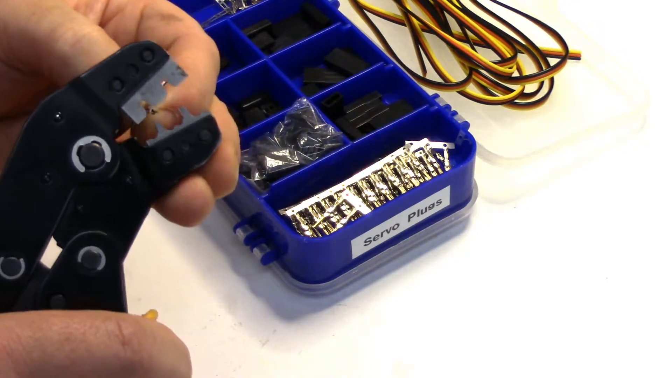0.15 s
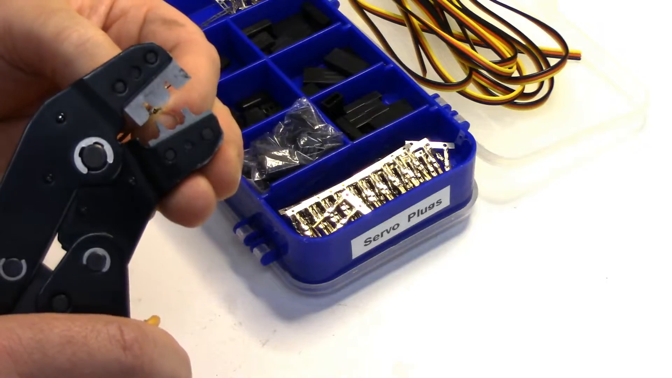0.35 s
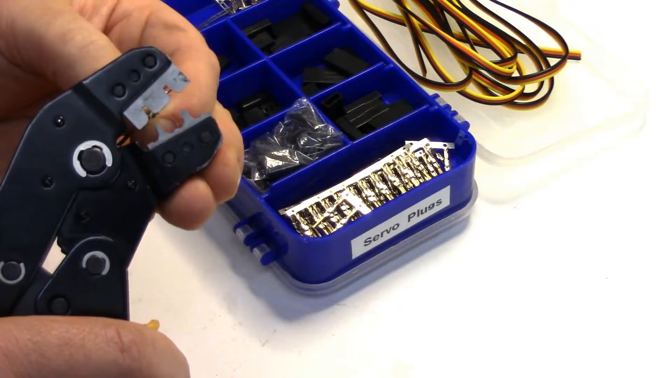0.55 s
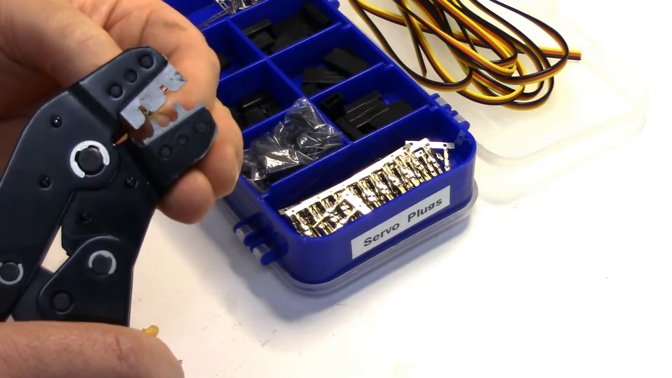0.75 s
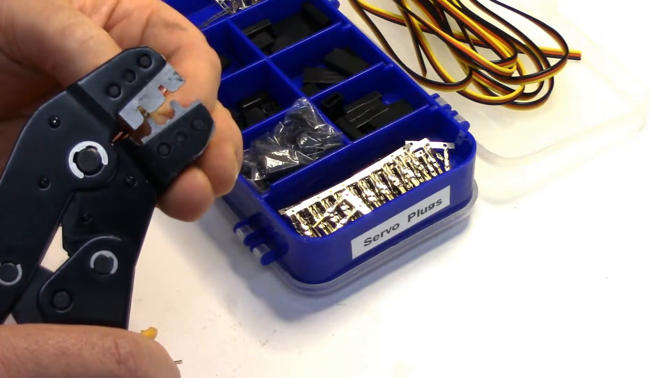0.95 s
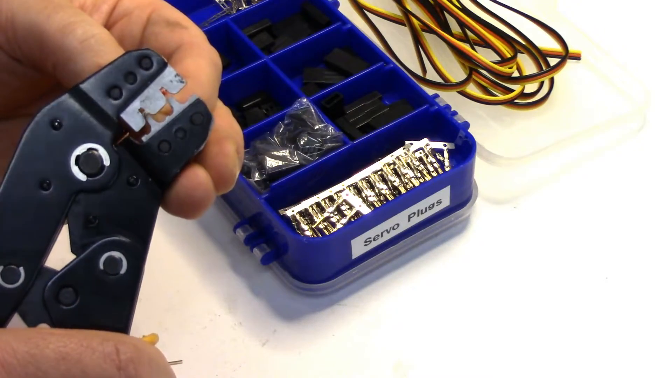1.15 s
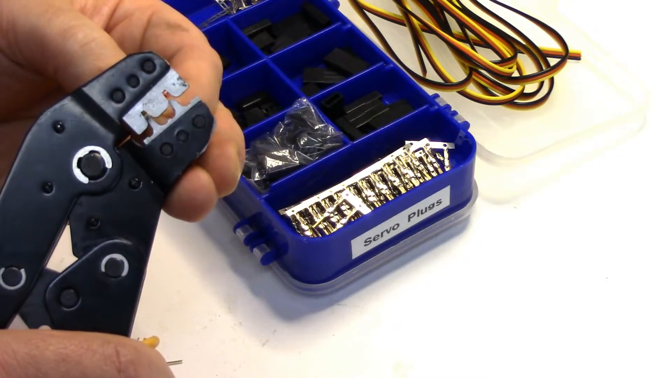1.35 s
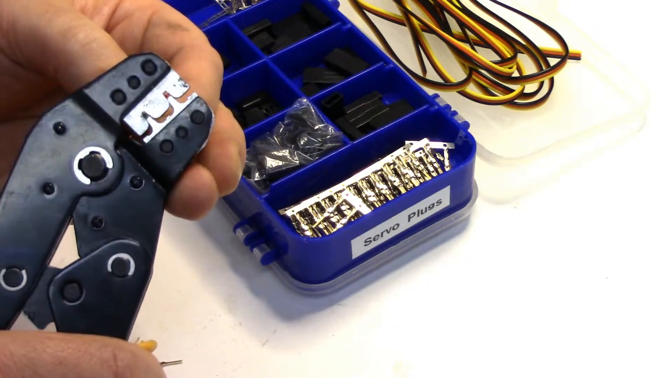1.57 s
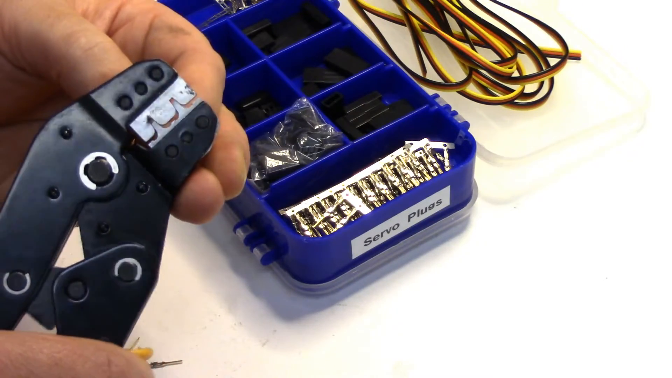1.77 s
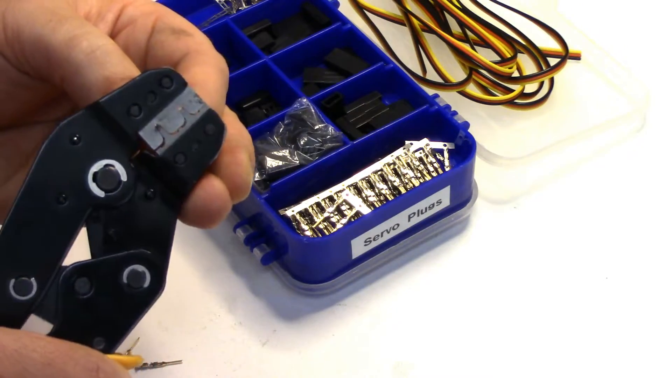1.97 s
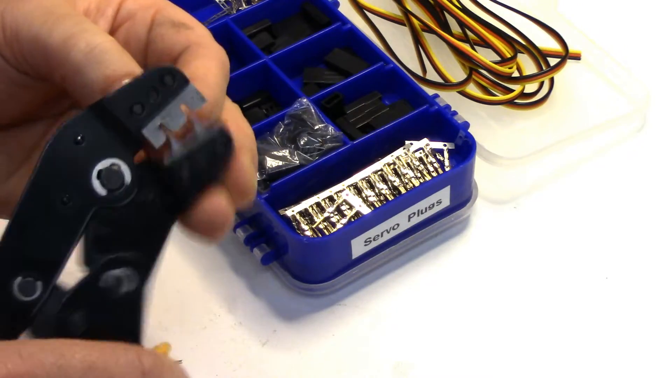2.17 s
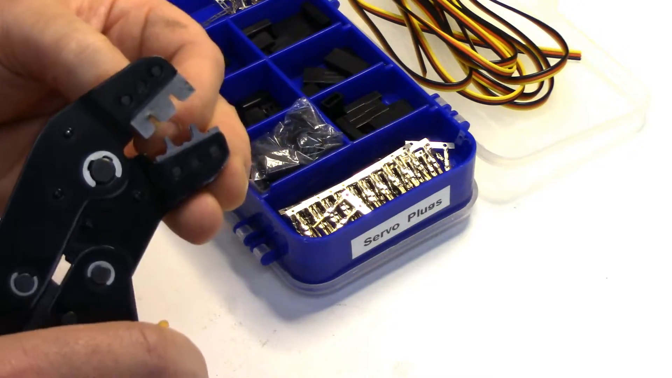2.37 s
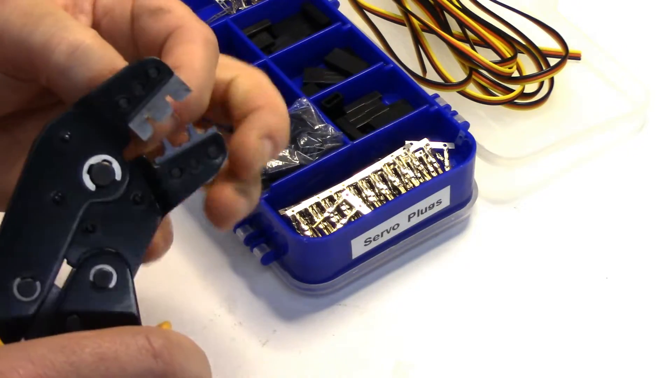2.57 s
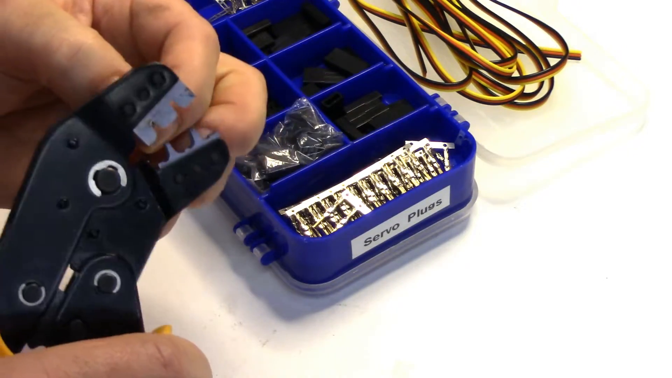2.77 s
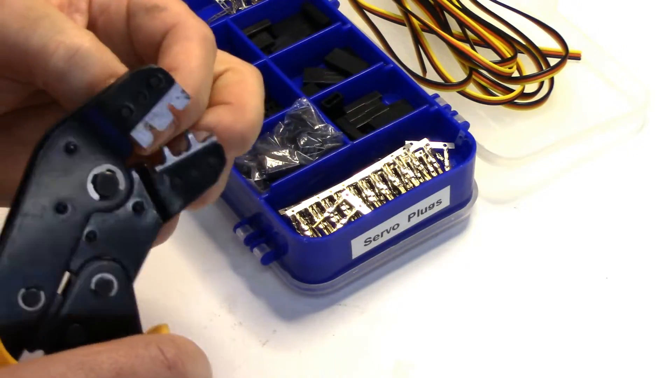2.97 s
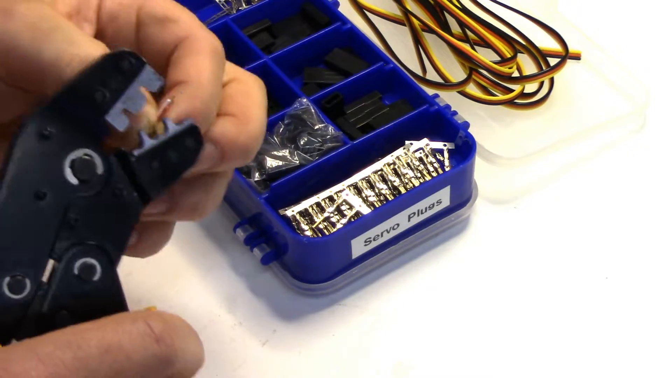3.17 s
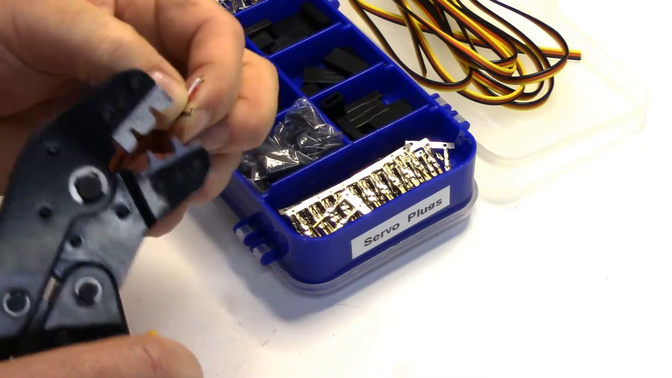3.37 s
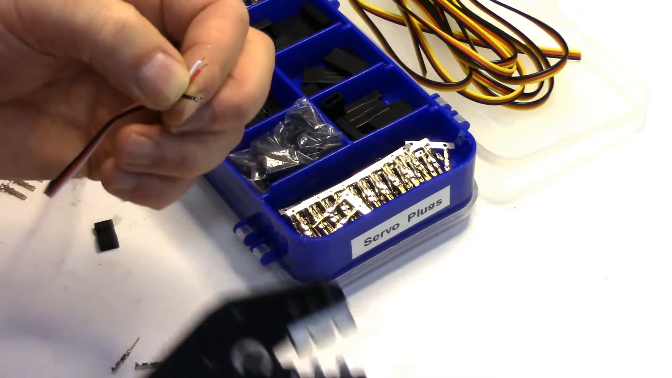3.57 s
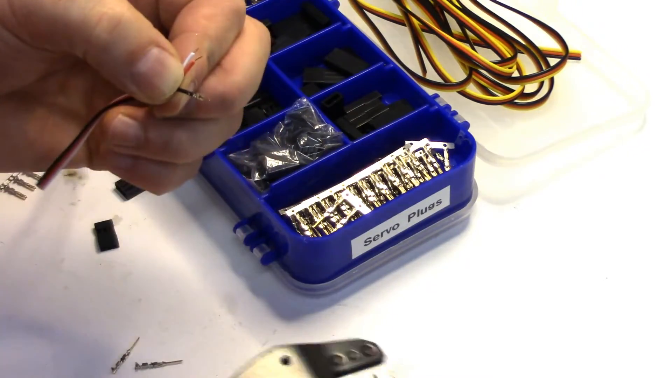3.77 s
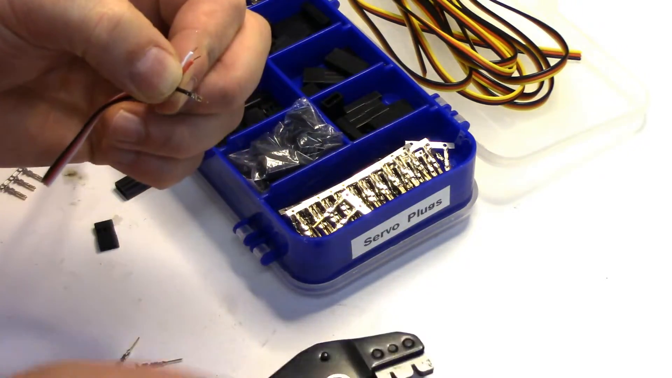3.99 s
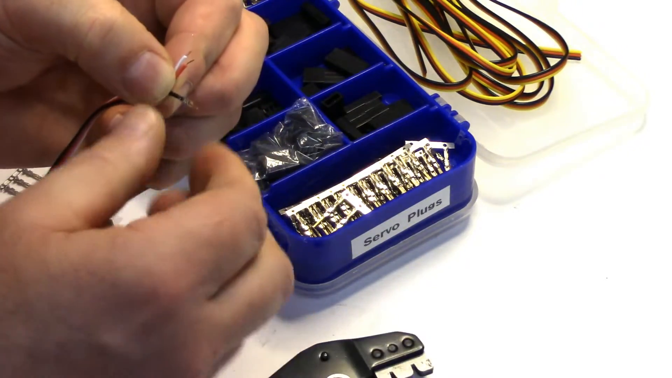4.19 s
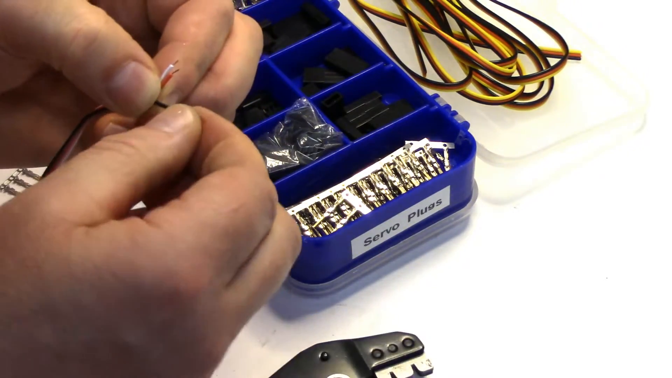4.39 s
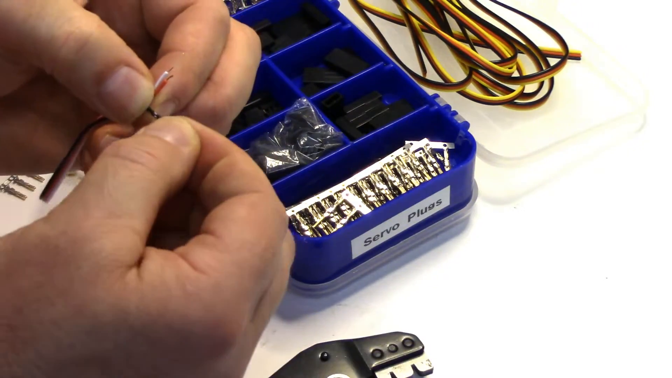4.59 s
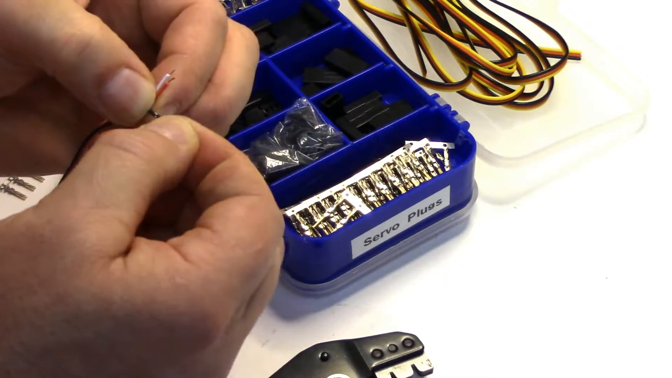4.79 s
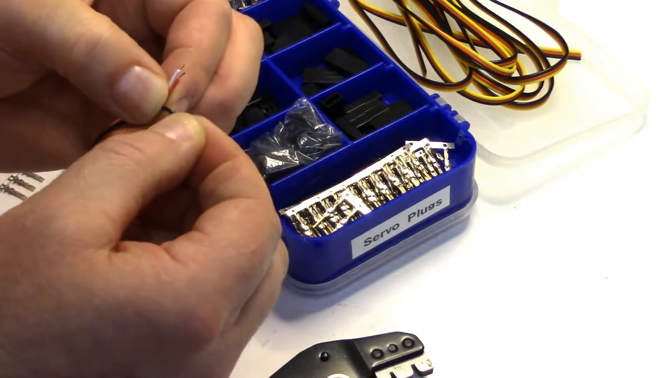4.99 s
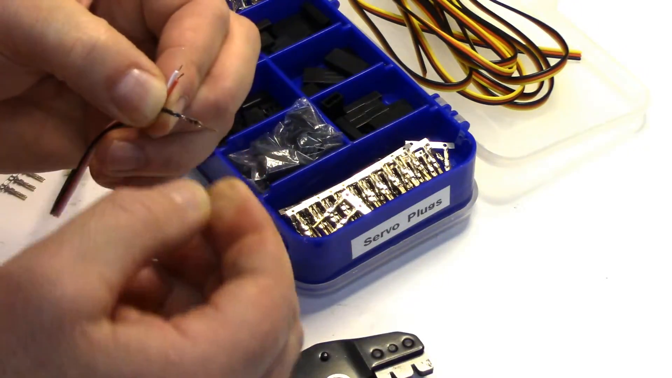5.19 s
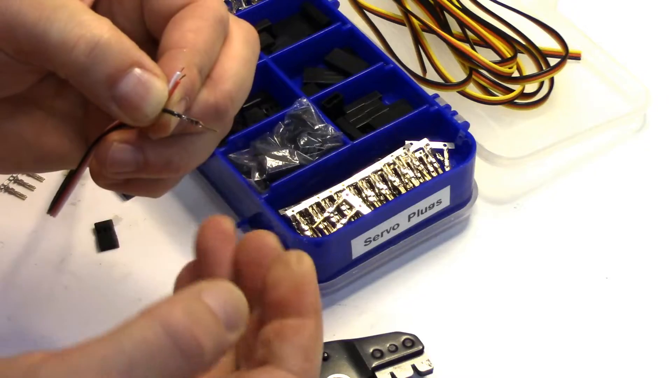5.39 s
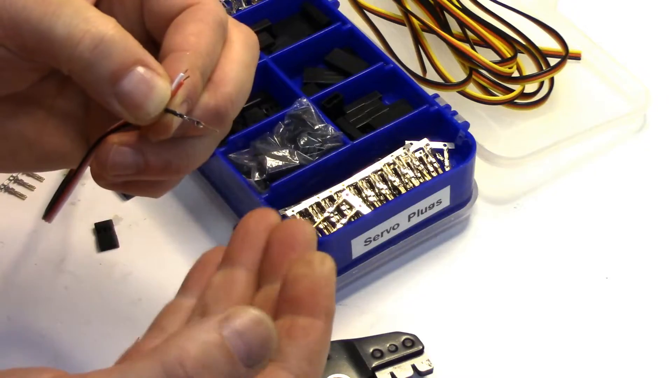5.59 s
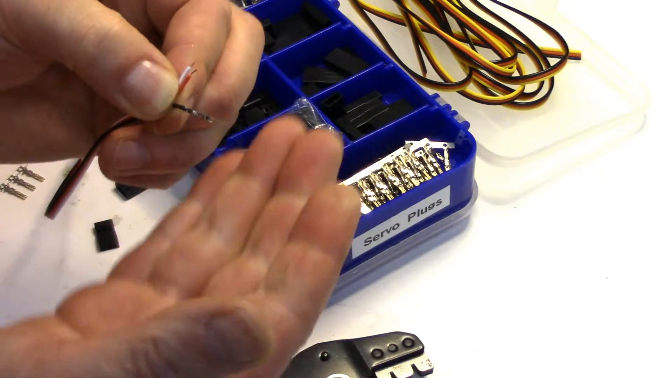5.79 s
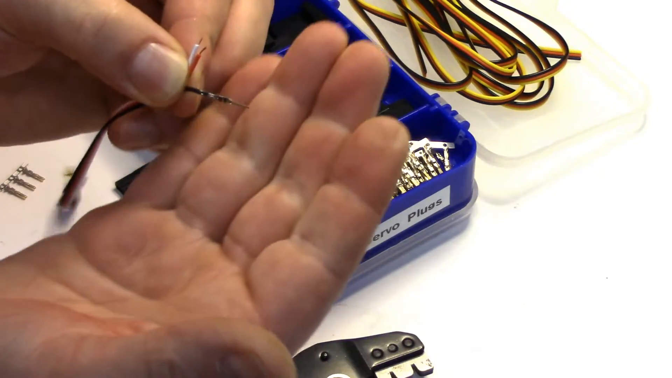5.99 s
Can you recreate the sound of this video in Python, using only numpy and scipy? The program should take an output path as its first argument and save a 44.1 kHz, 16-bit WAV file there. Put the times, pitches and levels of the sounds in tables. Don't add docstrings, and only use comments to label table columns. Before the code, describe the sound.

A ratcheting crimping tool gives four sharp steel clicks, snaps shut, rattles open, then is set down with a clattering knock on a hollow bench.

```python
import sys
import numpy as np
from scipy import signal
from scipy.fft import rfft, irfft, next_fast_len
from scipy.io import wavfile
from scipy.ndimage import map_coordinates

SR = 44100
rng = np.random.default_rng(int(sys.argv[2]) if len(sys.argv) > 2 else 0)


def gain_from_db(level_db):
    decades = np.asarray(level_db, float) / 20
    return 10 ** decades


def to_wav(sig):
    pcm = np.clip(np.atleast_2d(sig), -1, 1) * 32767
    pcm = np.round(pcm).astype(np.int16)
    wavfile.write(sys.argv[1], SR, pcm.T)


N = 266760

# start in seconds, peak in dB, contact length in seconds.
TEETH = [
    (1.1605, -3.5, 0.01346),
    (1.48, -6.5, 0.0209),
    (1.589, -6, .008),
    (1.8156, -5.5, 0.0066),
]
# start in seconds, peak in dB, contact length in seconds.
JAWS = [
    (1.8499, -6, 0.018),
    (1.8719, -12.5, 0.0194),
    (1.8739, -1.5, 0.0208),
    (1.886, -15.5, 0.0124),
]
# start in seconds, peak in dB, contact length in seconds.
RATTLE = [
    (2.2187, -5, 0.032),
    (2.2243, -5, .016),
    (2.2293, -5, 0.0092),
    (2.2328, -6, .016),
    (2.2375, -11, .014),
    (2.2408, -4.5, 0.0128),
    (2.258, -20, 0.0136),
]
# start in seconds, peak in dB, contact length in seconds.
SLACK = [
    (1.0715, -50, 0.048),
    (1.1338, -47.5, 0.0074),
    (1.4705, -40.5, 0.0158),
    (2.168, -38.5, 0.0127),
    (2.1904, -29, 0.017),
    (2.2014, -38.5, 0.022),
]
# start in seconds, peak in dB.
TOUCHES = [
    (.7053, -46.5),
    (0.7215, -46),
    (0.963, -55.5),
    (3.1393, -40),
    (3.1474, -45),
    (3.1752, -40.5),
    (3.1841, -46.5),
    (3.2139, -50),
    (3.2269, -49),
    (3.3404, -51.5),
]
# start in seconds, peak in dB.
GRAZES = [
    (3.82, -49.5),
    (3.835, -46),
]
# frequency in Hz, width in Hz, level in dB.
STEEL = [(1260, 1000, -20.5), (1700, 440, -8.5), (2150, 560, -13), (3090, 1000, 11.5), (3280, 120, -8.5),
         (3620, 300, -6), (5100, 790, 11), (6176, 1600, 10), (8340, 1300, 10), (9700, 2000, 5.5),
         (13430, 2700, -2)]
# frequency in Hz, level in dB, t60 in seconds.
PAWL = [(2040, -2, .16), (2290, -2.5, .16), (2930, -2.5, 0.22), (3230, -5.5, .14), (3670, -3.5, 0.3),
        (5800, -4, .22), (6600, -5, .15)]
# frequency in Hz, level in dB, t60 in seconds.
SHUT = [(950, -24, 2), (1680, 8, 0.085), (1776, -3, 0.26), (1850, -7, 0.47), (2988, -11.5, 0.228),
        (3210, 1, .2), (3305, -4.5, 0.3542), (5960, -5, .35), (6360, -11, .2)]
# frequency in Hz, level in dB, t60 in seconds.
OPEN = [(951, -15.5, 1.2), (2173, -6, .25), (2960, -11, .25), (5480, -2.5, 0.353), (3847, 1.5, .3)]
# frequency in Hz, level in dB, t60 in seconds.
FADING = [(3670, -1, .35), (6616, -9.5, .3)]
# start in seconds, level in dB.
FAINT_RINGS = [
    (.001, -55),
    (1.071, -55.5),
]
# time in seconds, pitch in Hz, level in dB.
SPRING = [
    (2.245, 3690, -38),
    (2.3, 3690, -48),
    (2.39, 3680, -53),
    (2.45, 3820, -53),
    (2.52, 3800, -59),
    (2.56, 3790, -70),
]
# start in seconds, peak in dB,
# hardness in dB.
KNOCKS = [(1.886, -33.5, -8), (3.8733, 0.5, -10), (3.887, -6.5, -7.5), (3.898, -6.5, -6),
          (3.913, -2.5, -9.5), (3.925, -3.5, -11.5), (3.950, -13.5, -8.5), (3.9636, -9.5, -5),
          (3.9764, -4.5, -8), (3.990, -11.5, -2.5), (4.0017, -12, 3.5), (4.0048, -5.5, -19),
          (4.018, -12, -10), (4.0382, -17, 6.5), (4.043, -8.5, -20.5), (4.057, -14.5, -4.5),
          (4.084, -11, -20), (4.100, -18.5, -11.5), (4.125, -31.5, -1), (4.177, -14.5, -20.5),
          (4.205, -27.5, -14), (4.235, -30, -18.5)]
# start in seconds, peak in dB.
TICKS = [
    (3.8738, -22),
    (3.911, -32),
    (3.9635, -39.5),
    (3.9765, -48.5),
    (3.990, -50.5),
    (4.0014, -17),
    (4.0045, -26),
    (4.0385, -34.5),
]
# frequency in Hz, width in Hz, level in dB.
BENCH = [(114, 13, -12), (189, 26, -9), (270, 44, -10), (396.1, 45, 1.5), (470.8, 53, -3), (580.7, 45, 1),
         (718.3, 73, -0.5), (920, 384, -7), (1159, 440, -9)]
# frequency in Hz, width in Hz, level in dB.
FACE = [(1393, 698, -1.5), (1936.5, 600, 6.5), (2244.6, 630, 4.5), (2815.5, 724, -1.5)]
# start in seconds, peak in dB, pitch in Hz, beats to the first weak step, count of weak steps.
LENS = [(3.5623, -45, 2050, 0, 0), (3.5992, -41.5, 1800, 0, 0), (3.7504, -43, 2050, 3, 1),
        (4.3508, -41.5, 2080, 3, 4), (4.5508, -45.5, 2065, 2, 2), (4.703, -47.5, 1680, 2, 1),
        (4.801, -43, 2100, 3, 3), (5.0013, -43.5, 2097, 2, 1), (5.1515, -44.5, 2100, 2, 1),
        (5.334, -44, 2010, 2, 1), (5.5521, -42, 2090, 3, 4), (5.785, -44.5, 2050, 0, 0),
        (5.9362, -43, 2080, 0, 0)]
# peak time in seconds, level in dB, rise and fall in dB per second.
HANDS = [
    (2.56, -57.5, 76, 162.5),
    (2.68, -61.5, 58.5, 116),
    (3.27, -58, 46.5, 87.5),
    (5.55, -51, 400, 259.5),
]
# frequency in Hz, level in dB per Hz.
RUB = [(200, -30.5), (450, -2.5), (800, -1), (1500, -4), (3000, -18.5), (6000, -35.5)]
# frequency in Hz, level in dB per Hz.
RUMBLE = [(60, -38), (130, -9.5), (200, -7), (280, 2), (340, -7.5), (450, -16.5), (800, -45)]
# frequency in Hz, level in dB per Hz.
HISS = [(15, -58.5), (25, -31), (114, -10), (280, -4.5), (726, -9), (2250, -17.5), (11900, -36),
        (16500, -54.5)]
# frequency in Hz, level in dB.
HUM = [(118.4, -71), (242.2, -66.5), (360.7, -72.5), (479.1, -72.5), (839.8, -65), (958.2, -75.5),
       (1319, -74), (2073, -79.5), (5561, -87.5), (11639, -92)]
# frequency in Hz, correlation.
ALIKE = [(60, .7), (240, 0.74), (950, 0.655), (3770, 0.798), (8000, 0.93), (15000, 0.27)]
# frequency in Hz, t60 in seconds.
ROOM = [(100, 0.98), (500, 0.51), (1200, 0.61), (3000, .52), (6000, 0.453), (10000, .32), (14000, 0.22)]
# frequency in Hz, correlation from 0 to 1.
WALLS = [(100, 1), (600, .99), (2000, 1), (5000, 1), (12000, .6)]
# frequency in Hz, gain in dB.
MIC = [(20, 2.5), (50, 6), (90, 0), (14500, 1.5), (15600, -2.5), (16500, -13)]
# end in seconds, lowest frequency lost in Hz.
STARVED = [
    (1.155, 2500),
    (1.471, 2000),
    (1.586, 6000),
    (2.213, 1500),
    (3.870, 30),
]

# (frame dB, jaw dB, edge dB)
TOOTH, JAW, LOOSE = (-3, -3.5, 2), (8, -1, -3), (-1.5, -2.5, -2)
LINK, WIRE, TIP = (-3.5, 0.915, -3.5), (-11.5, -3.5, 1), (1.5, 12.5, -18.5)
TOUCH_S, GRAZE_S = .015, 0.061
RING_LAG_S, PAWL_RING_DB = .001, -31
SHUT_RING, OPEN_RING = (1.875, -29.5), (2.234, -33)  # (s, dB)
KNOCK_S, SOFTER_S_PER_DB = .029, 0.007
DULL_PER_DB, BENCH_MID_HZ = 0.3627, 420
KNOCK_SHOCK = .7
BEAT_S, SETTLE_S = 1 / 59.94, .0014
WEAK_DB, WEAK_FADE_DB, WEAK_HZ, WEAK_SCATTER_HZ = -48.5, 1, 1960, 110
WHINE_HZ, WHINE_DB, AWAKE_S = 5630, -81.5, 3.55
RUMBLE_DB, RUMBLE_HOLD_S, RUMBLE_FADE_DB_PER_S, HISS_DB = -58, 1.596, 4.5, -56
LAG = 1.1
TOP_HZ = 16600
FRAME, FRAME_START = 1024, 150


def clicks(near, far):
    touches = [(s, db, TOUCH_S) for s, db in TOUCHES]
    grazes = [(s, db, GRAZE_S) for s, db in GRAZES]
    kinds = [(TEETH, TOOTH), (JAWS, JAW), (RATTLE, LOOSE), (SLACK, LINK), (touches, WIRE), (grazes, TIP)]
    for rows, (frame_db, jaw_db, edge_db) in kinds:
        share = [(1700, frame_db), (3300, jaw_db), (6200, 0.0015), (11500, edge_db)]
        tool = [(hz, width, db + along(share, hz)) for hz, width, db in STEEL]
        for s, db, length in rows:
            strike(near, far, s, db, [(tool, 0, length, .0002)], after_db=-11.5, wet_db=-13.0)


def rings(near):
    blows = [(s + RING_LAG_S, db + PAWL_RING_DB, PAWL) for s, db, _ in TEETH + JAWS[:1]]
    blows += [(*SHUT_RING, SHUT), (*OPEN_RING, OPEN)]
    blows += [(s, db, FADING) for s, db in FAINT_RINGS]
    for s, db, modes in blows:
        add(near, s, gain_from_db(db) * ring(modes, beat=4))
    s, hz, db = np.transpose(SPRING)
    t = np.arange(s[0], s[-1], 1 / SR)
    swell, shiver = wobble(80)[:len(t)], wobble(120)[:len(t)]
    phase = 2 * np.pi * np.cumsum(np.interp(t, s, hz)) / SR + 1.3 * shiver
    add(near, s[0], gain_from_db(np.interp(t, s, db) + 3 * swell) * np.sin(phase))


def knocks(near, far):
    for s, db, hard_db in KNOCKS:
        length = KNOCK_S + SOFTER_S_PER_DB * abs(hard_db)
        tilt = DULL_PER_DB * min(hard_db + 7, 0)
        top = [(hz, width, g + tilt * np.log2(hz / BENCH_MID_HZ)) for hz, width, g in BENCH]
        parts = [(top, 0, length, .0003), (FACE, hard_db, length * 1.1, .0003)]
        strike(near, far, s, db, parts, after_db=-18, wet_db=-12.0, shock=KNOCK_SHOCK)
    for s, db in TICKS:
        strike(near, far, s, db, [(STEEL, 0, .016, .0004)], after_db=-16, wet_db=-11.5)


def strike(near, far, s, db, parts, after_db, wet_db, shock=.37):
    t = np.arange(8192) / SR
    hz = np.fft.rfftfreq(len(t), 1 / SR)
    blow, colours = 0, []
    for peaks, share_db, length, rise in parts:
        push = gain_from_db(-60 * t / length) + gain_from_db(after_db - 60 * t / (4 * length))
        force = rng.laplace(size=len(t)) * push * (1 - np.exp(-t / rise))
        force[round(rise * SR)] = shock * np.linalg.norm(force)
        response = radiated(peaks)
        part = irfft(rfft(force) * response(hz))
        part = gain_from_db(db + share_db) * part / np.abs(part).max()
        blow = blow + part
        colours.append((response, np.linalg.norm(rfft(part)) / np.linalg.norm(response(hz))))
    add(near, s, blow)
    add(far, s, room(lambda f: sum(gain * response(f) for response, gain in colours), wet_db))


def ring(modes, beat):
    t = np.arange(SR // 2) / SR
    total = 0
    for hz, db, t60 in modes:
        loose = min(hz / 2000, 1) ** 2
        shake_db, shake_turn = (beat * loose * np.interp(t, np.linspace(0, .5, num=110), knots)
                                for knots in rng.standard_normal((2, 110)))
        detune = 1 + .012 * loose * rng.standard_normal()
        phase = 2 * np.pi * hz * t * detune + .45 * shake_turn
        total = total + gain_from_db(db + shake_db - 60 * t / t60) * np.sin(phase)
    return total * (1 - np.exp(-t / 0.0016))


def body(peaks):
    def response(f):
        total = 0
        for k, (hz, width, db) in enumerate(peaks):
            damping = 1j * f * width
            total = total + (-1) ** k * gain_from_db(db) * damping / (hz * hz - f * f + damping)
        return total
    return response


def radiated(peaks):
    low, high = peaks[0][0] * 0.24, peaks[-1][0] * 2.9
    return lambda f: body(peaks)(f) / (1 + low / (1j * f + 1e-9)) ** 2 / (1 + 1j * f / high) ** 2


def room(colour, wet_db):
    hz, t, z = signal.stft(rng.standard_normal((2, SR * 3 // 5)), SR, nperseg=256)
    decay = gain_from_db(-60 * t / along(ROOM, hz)[:, None])
    tail = signal.istft(z * decay, SR, nperseg=256)[1]
    tail = tail * (1 - np.exp(-np.arange(tail.shape[1]) / (SR * .003)))
    return gain_from_db(wet_db) * spread(tail / np.linalg.norm(tail[0]), WALLS, colour)


def lens(near):
    t = np.arange(SR // 50) / SR
    steps = [row[:3] for row in LENS]
    for s, _, _, wait, count in LENS:
        for k, (a, b) in enumerate(rng.standard_normal((count, 2))):
            late = SETTLE_S + (wait + 2 * k) * BEAT_S
            steps.append((s + late, WEAK_DB - WEAK_FADE_DB * k + 1.6 * a, WEAK_HZ + WEAK_SCATTER_HZ * b))
    for s, db, hz in steps:
        grit = filtered(rng.standard_normal(len(t)), lambda f: np.abs(f - hz) < 1500)
        buzz = np.sin(2 * np.pi * hz * t) + .3 * grit
        add(near, s - .0005, gain_from_db(db + 12.5) * (t / 0.001304) * np.exp(-t / 0.000881) * buzz)
    t = np.arange(N) / SR
    whine = np.sin(2 * np.pi * WHINE_HZ * t + 1.4 * wobble(40))
    add(near, 0, gain_from_db(WHINE_DB + 6.36 * wobble(16)) * (t > AWAKE_S) * whine)


def hands():
    t = np.arange(N) / SR
    strokes = sum(gain_from_db(db - np.maximum(rise * (s - t), fall * (t - s))) for s, db, rise, fall in HANDS)
    grains = rng.standard_normal(N) * gain_from_db(1.8 * wobble(90))
    return strokes * unit(filtered(grains, lambda hz: gain_from_db(along(RUB, hz))))


def air():
    t = np.arange(N) / SR

    def noise(shape):
        return unit(spread(rng.standard_normal((2, N)), ALIKE, lambda hz: gain_from_db(along(shape, hz))))

    fade_db = RUMBLE_FADE_DB_PER_S * np.maximum(t - RUMBLE_HOLD_S, 0)
    rumble = gain_from_db(RUMBLE_DB - fade_db + 1.5 * wobble(11)) * noise(RUMBLE)
    hiss = gain_from_db(HISS_DB) * gain_from_db(.4 * wobble(4)) * noise(HISS)
    tones = 0
    for hz, db in HUM:
        tones = tones + gain_from_db(db + 3 + 1.5 * wobble(6)) * np.sin(2 * np.pi * hz * t + .6 * wobble(8))
    return rumble + hiss + tones


def along(points, hz):
    f, v = np.transpose(points)
    return np.interp(np.log(hz + 1), np.log(f + 1), v)


def unit(x):
    return x / np.sqrt(np.mean(x ** 2) + 1e-20)


def wobble(rate):
    return map_coordinates(rng.standard_normal(int(N * rate / SR) + 4), [np.arange(N) * rate / SR])


def filtered(x, response):
    n = x.shape[-1]
    m = next_fast_len(n + 8192)
    return irfft(rfft(x, m) * response(np.fft.rfftfreq(m, 1 / SR)), m)[..., :n]


def spread(pair, alike, colour):
    def shares(hz):
        turn = np.arccos(np.clip(along(alike, hz), -1, 1)) / 2
        return colour(hz) * np.array([np.cos(turn), np.sin(turn)])

    mid, side = filtered(pair, shares)
    return np.array([mid + side, mid - side])


def add(track, s, x):
    part = track[..., round(s * SR):][..., :x.shape[-1]]
    part += x[..., :part.shape[-1]]


def scene():
    near, far = hands(), air()
    clicks(near, far)
    rings(near)
    knocks(near, far)
    lens(near)
    return filtered(near + far, lambda hz: np.exp(np.outer([-1j, 1j], np.pi * hz * LAG / SR)))


def roll_off(x):
    return signal.sosfilt(signal.butter(12, 16640, fs=SR, output="sos"), x)


def record(dry):
    x = dry / (1 + np.abs(dry / .93) ** 6) ** (1 / 6)
    x = filtered(x, lambda hz: gain_from_db(along(MIC, hz)) * (hz < TOP_HZ))
    t = np.arange(N) / SR
    for end, low_hz in STARVED:
        start = end - (end * SR - FRAME_START) % FRAME / SR
        gap = np.clip(np.minimum(t - start, end - t) / .001 + .5, 0, 1)
        x = x - .95 * gap * filtered(x * (t < end), lambda hz: hz > low_hz)
    return roll_off(x)


dry = scene()
out = record(dry)
to_wav(out)
```